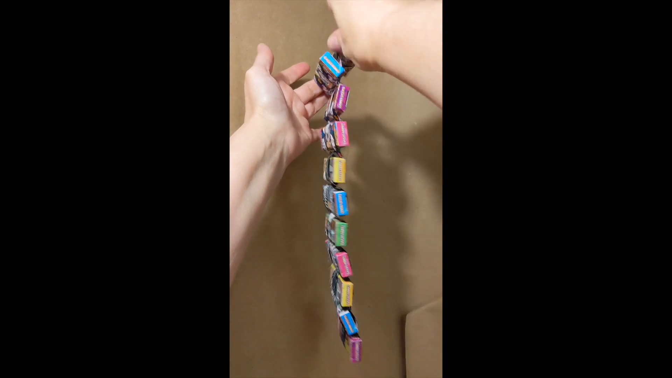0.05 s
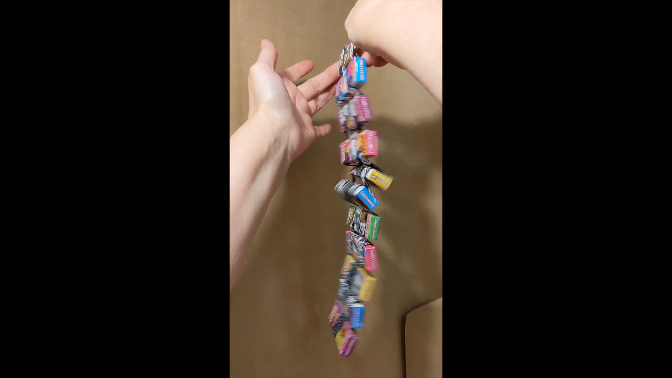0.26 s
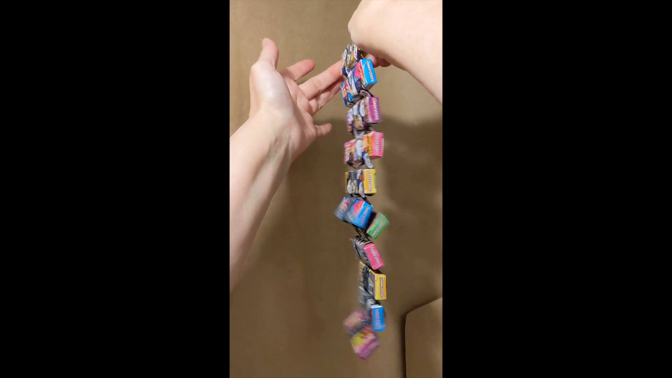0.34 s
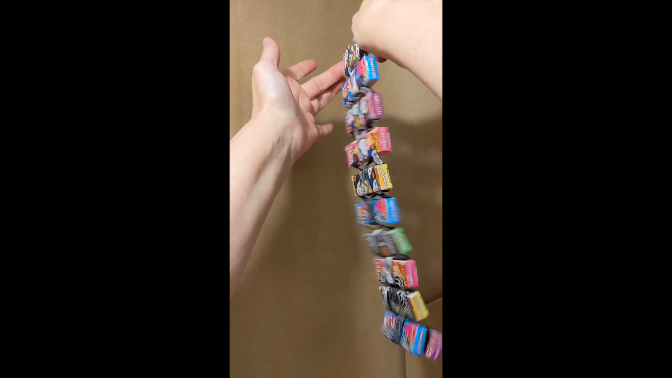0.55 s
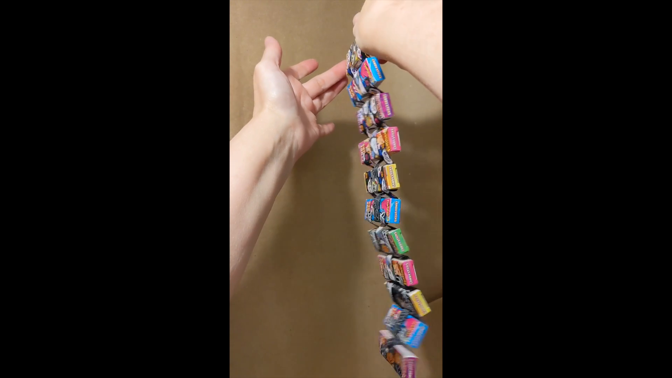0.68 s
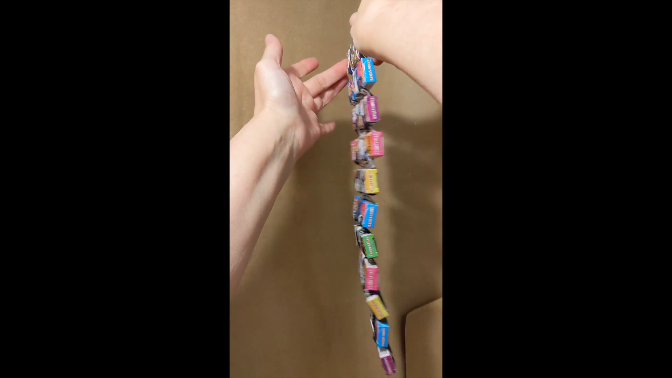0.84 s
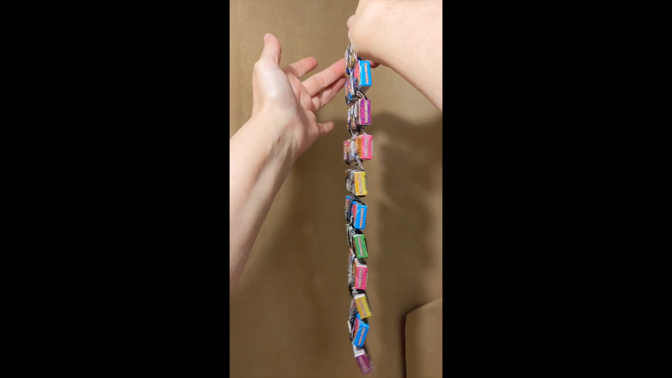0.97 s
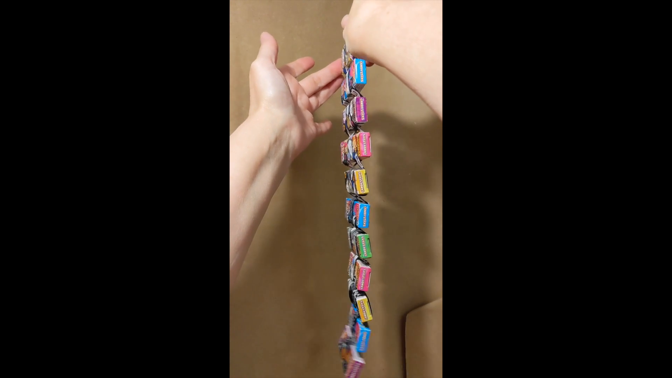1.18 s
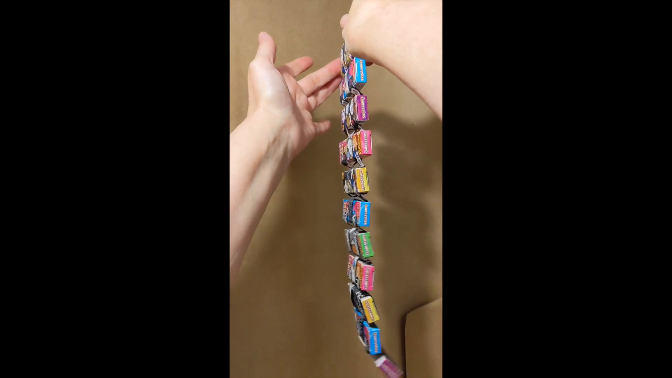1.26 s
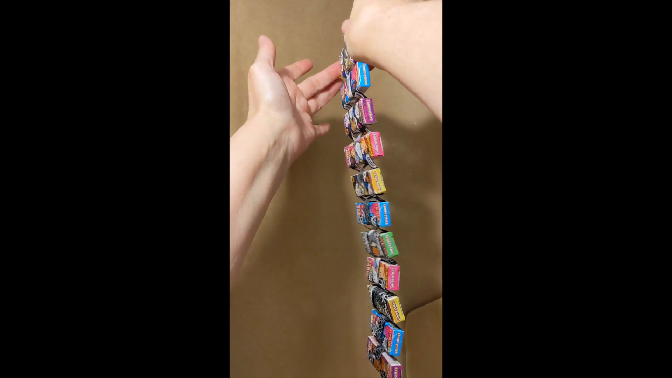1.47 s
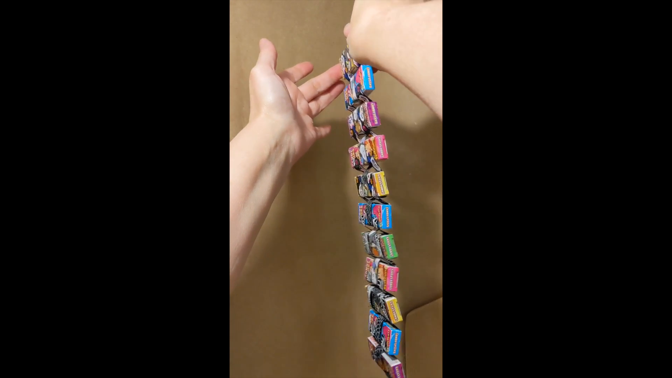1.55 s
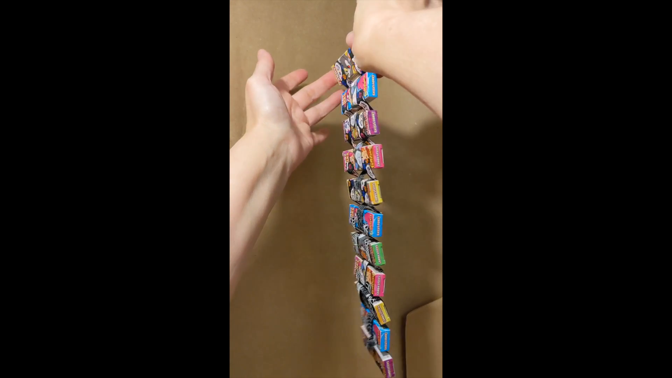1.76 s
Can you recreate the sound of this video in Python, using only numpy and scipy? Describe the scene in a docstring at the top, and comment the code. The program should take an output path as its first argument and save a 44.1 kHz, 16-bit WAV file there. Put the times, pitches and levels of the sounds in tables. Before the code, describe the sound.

Small ribbon-linked cardboard boxes tumble down in a quick clattering cascade, then tap lightly while swinging

```python
"""A quiet room, a pair of microphones: a ladder of small ribbon-linked cardboard boxes tumbles down,
knocks at the bottom and swings out. Each knock is a short dense burst of tiny contacts (edges, loose
contents) ringing in the boxes; light taps have weaker bounces, and card and ribbon rustle in between.
Contacts are random clicks sent through resonances; the room answers with dying dull noise.
Below lie a wavering low hum (noise in a narrow resonance) and the room's hiss (coloured noise)."""
import sys
import numpy as np
from scipy import signal
from scipy.fft import rfft, irfft
from scipy.io import wavfile

SR = 44100
rng = np.random.default_rng(int(sys.argv[2]) if len(sys.argv) > 2 else 0)


def convert_level_to_amplitude(level_db):
    """Map a level in decibels to its linear amplitude factor."""
    exponent = np.asarray(level_db, float) / 20
    return 10 ** exponent


def int16_out(signal):
    """Quantize to a 16-bit WAV file."""
    q = np.round(np.clip(np.atleast_2d(signal).T, -1, 1) * 32767)
    wavfile.write(sys.argv[1], SR, q.astype(np.int16))


N = 79380    # samples, 1.8 s


def rms_one(x):
    """Scale to unit rms."""
    return x / np.sqrt(np.mean(x ** 2) + 1e-20)


def at_hz(points, hz):
    """Read a (f/Hz, value) table on a log-frequency axis."""
    table_hz, values = np.transpose(points)
    return np.interp(np.log(hz), np.log(np.maximum(table_hz, 1)), values)


def drift(corner_hz):
    """Slow random wander of rms 1: noise through two equal one-pole low-passes."""
    r = np.exp(-2 * np.pi * corner_hz / SR)
    slow = signal.lfilter([1], [1, -2 * r, r * r], rng.standard_normal(N + SR))
    return rms_one(slow[SR:])    # the first second lets the filter settle


def ring(clicks, hz, t60):
    """Two-pole resonance that passes white noise at unchanged power."""
    r = convert_level_to_amplitude(-60 / (t60 * SR))
    w = 2 * np.pi * hz / SR
    gain = np.sqrt((1 - r * r) / 2)
    return signal.lfilter(gain * np.array([1, 0, -1]), [1, -2 * r * np.cos(w), r * r], clicks + 1e-18)


def contacts(per_s, spread_db):
    """Tiny contacts as random clicks of uneven size and either sign, rms 1."""
    size = convert_level_to_amplitude(spread_db * np.minimum(rng.exponential(1, N), 3))
    sign = rng.choice([-1, 1], N)
    struck = rng.random(N) < per_s / SR
    return rms_one(size * sign * struck)


HUM_HZ, HUM_DB = 60.3, -61.5
HUM_WIDTH_HZ = 12    # bandwidth of each of the two passes


def hum():
    """Wavering hum: noise twice through a narrow low resonance, the same at both microphones."""
    t60 = np.log(1000) / (np.pi * HUM_WIDTH_HZ)
    once = ring(rng.standard_normal(N + SR), HUM_HZ, t60)
    twice = ring(once, HUM_HZ, t60)
    return convert_level_to_amplitude(HUM_DB) * rms_one(twice[SR:])


# colour of the room's hiss: [f/Hz, relative level/dB per Hz]
HISS_COLOUR = [(30, -14), (70, -7), (157, -2), (273, -10), (1040, -18.5), (1860, -21.5), (3670, -44),
               (5590, -26), (13700, -37.5), (16000, -89)]
# likeness of the hiss at the two microphones: [f/Hz, left-right correlation from -1 to 1]
HISS_LIKENESS = [(60, 0.86), (240, 0.93), (950, 0.24), (3770, -0.4)]
HISS_DB = -60.5


def hiss():
    """Steady room noise: shaped mid and side noise, much alike at both microphones in the bass only."""
    hz = np.maximum(np.arange(N // 2 + 1) * SR / N, 1)
    alike = np.clip(at_hz(HISS_LIKENESS, hz), -1, 1)
    mid, side = rfft(rng.standard_normal((2, N))) * convert_level_to_amplitude(at_hz(HISS_COLOUR, hz))
    left_right = np.sqrt(1 + alike) * mid + np.sqrt(1 - alike) * side * [[1], [-1]]
    return convert_level_to_amplitude(HISS_DB) * rms_one(irfft(left_right, N))


ROOM_T60_S, ROOM_DB = 0.1, -13
WALL_CUT_HZ = 6300
ROOM_ALIKE_HZ = 650    # the answer is alike at both microphones below this


def room(x):
    """The room's answer: dull noise that dies away, starting 3 ms (a metre of path) after the direct sound."""
    t = np.arange(SR // 3) / SR
    mid, side = rng.standard_normal((2, len(t)))
    side = signal.sosfilt(signal.butter(1, ROOM_ALIKE_HZ, "high", fs=SR, output="sos"), side)
    dull = np.exp(-2 * np.pi * WALL_CUT_HZ / SR)
    answer = signal.lfilter([1], [1, -dull], [mid + side, mid - side])
    answer = answer * convert_level_to_amplitude(-60 * t / ROOM_T60_S) * (t > .003)
    unit_answer = rms_one(answer) / np.sqrt(len(t))
    return convert_level_to_amplitude(ROOM_DB) * signal.fftconvolve(x, unit_answer, axes=1)[:, :N]


# rustle of card and ribbon: [t/s, middle level/dB, treble level/dB], before clumping and ringing
RUSTLE_COURSE = [(0, -57.5, -63), (0.122, -62.5, -60.5), (.15, -68, -80), (.19, -64, -64),
                 (0.233, -44.5, -46.5), (.32, -44, -46.5), (.36, -49.5, -55), (.43, -43, -49.5),
                 (.6, -39, -45), (0.701, -47.5, -53.5), (0.728, -61, -60), (0.799, -50.5, -54),
                 (.9, -56.5, -64), (1.0, -58.5, -64.5), (1.13, -68.5, -79), (1.8, -70.5, -71.5)]
RUSTLE_BASS_DB = -6.5    # against the middle
RUSTLE_CONTACTS_PER_S, RUSTLE_SPREAD_DB = 400, 0.5    # per resonance
RUSTLE_CLUMP_HZ, RUSTLE_CLUMP_DB = 59, 2.7            # corner and rms of the level wander


def rustle_envelopes():
    """Force of the rustle in bass, middle and treble; it clumps, partly in step across the three."""
    s, middle_db, treble_db = np.transpose(RUSTLE_COURSE)
    t = np.arange(N) / SR
    shared = drift(RUSTLE_CLUMP_HZ)
    envelopes = []
    for course_db in (middle_db + RUSTLE_BASS_DB, middle_db, treble_db):
        clump = (shared + drift(RUSTLE_CLUMP_HZ)) / np.sqrt(2)
        envelopes.append(convert_level_to_amplitude(np.interp(t, s, course_db) + RUSTLE_CLUMP_DB * clump))
    return envelopes


# light taps while the ladder hangs and swings:
# [t/s, nominal peak level/dB, pitch f/Hz, treble level against peak/dB]
SWING_TAPS = [(0.0583, -39, 2260, -5.5), (0.0883, -43, 2050, -19), (0.1214, -46.5, 2730, -1.5),
              (0.156, -43, 2340, -4), (0.7396, -36.5, 1900, -20), (1.039, -40.5, 3200, -16),
              (1.0522, -35.5, 3230, -13), (1.0745, -36.5, 3180, -19.5), (1.099, -56, 3100, -23),
              (1.1469, -47.5, 1950, -5), (1.1747, -40.5, 2970, -18), (1.2305, -36, 2480, -26),
              (1.252, -48, 2900, -13), (1.2854, -46.5, 1700, -22.5), (1.3256, -37.5, 1270, -19),
              (1.3608, -47, 1910, -20), (1.394, -54, 2230, -32), (1.4079, -43.5, 1850, -25),
              (1.4197, -48, 1910, -3.5), (1.4874, -41.5, 1940, -13.5), (1.509, -42, 2180, -20),
              (1.5312, -47, 2640, -21), (1.6125, -46.5, 1840, -9), (1.6415, -47.5, 2130, -13),
              (1.672, -41.5, 2140, -18), (1.728, -41, 2260, -24)]
TAP_BASS_DB, TAP_T60_S = -12.5, .022    # bass against peak; die-away


def taps():
    """Each tap and its two weaker loose bounces, 5 to 35 ms later and 4 to 12 dB down, as knock rows."""
    touches = list(SWING_TAPS)
    late = rng.random((len(SWING_TAPS), 2, 2))
    for (s, db, _, treble_db), pair in zip(SWING_TAPS, late):
        for wait, size in pair:
            bounce_s = s + .03 * (0.18 + wait)
            bounce_db = db - 8 * (.5 + size)
            bounce_hz = 2600 * 2 ** (size - .5)    # weaker bounces are higher
            touches.append((bounce_s, bounce_db, bounce_hz, treble_db))
    return [(s, db, hz, TAP_BASS_DB, treble_db, TAP_T60_S) for s, db, hz, treble_db in touches]


# knocks of the tumble: [t/s, nominal peak level/dB, pitch f/Hz, bass level against peak/dB,
# treble level against peak/dB, die-away t60/s before the limits below]
TUMBLE_KNOCKS = [(0.1994, -29.5, 2050, -6.5, -7, 0.085), (0.2079, -27.5, 2360, -14, -10, 0.019),
                 (0.2175, -41, 1750, 0, -2, 0.045), (0.2397, -21.5, 6140, -17.5, -13, 0.02),
                 (0.2687, -21, 5900, -12, -15, 0.031), (0.3009, -26.5, 1870, -8, -6, 0.037),
                 (0.3067, -24.5, 1880, -17, -4.5, 0.018), (0.3697, -19.5, 1590, -11, -11.5, 0.049),
                 (0.3914, -27.5, 2970, -16, -18, 0.05), (0.4076, -34, 1870, -41, -21, 0.047),
                 (0.4216, -24, 2330, -19, -9, 0.053), (0.4406, -29, 2080, -8, -11, 0.042),
                 (0.4465, -26.5, 2280, -28, -7, 0.049), (0.4748, -24.5, 4640, -20, -11.5, 0.044),
                 (0.5105, -30, 2060, -10, -26, 0.013), (0.5455, -25.5, 2430, -29, -9, 0.044),
                 (0.5505, -24.5, 1900, -25, -10, 0.021), (0.5765, -19.5, 4700, -19, -12, 0.026),
                 (0.603, -26, 2020, -15, -19, 0.054), (0.6202, -19, 2530, -12.5, -6.5, 0.046),
                 (0.6255, -22.5, 5570, -25, -12.5, 0.027), (0.6306, -26, 1970, -5.5, -1.5, 0.023),
                 (0.649, -43.5, 1880, 5.5, -11, 0.04), (0.6826, -27.5, 1950, -19, -16, 0.034),
                 (0.6934, -29.5, 1910, -13, -15, 0.02), (0.7068, -43.5, 2080, -23, 4, 0.031),
                 (0.7503, -33, 1910, -17, -28, 0.029), (0.7650, -29, 2260, -9.5, -21, 0.023),
                 (0.7734, -26.5, 1780, -15, -12, 0.026), (0.7865, -27.5, 2950, -13.5, -17, 0.047),
                 (0.8008, -25, 2900, -28, -19, 0.013), (0.850, -35, 2080, -27, -15, 0.059),
                 (0.8617, -26.5, 2420, -14.5, -12.5, 0.029), (0.9256, -40, 1940, -13, -28, 0.036),
                 (0.9416, -37, 2220, -8, -9.5, 0.036), (0.9538, -34.5, 3230, -12, -17.5, 0.051),
                 (0.9795, -41.5, 1970, -13, -33, 0.051)]


def all_blows():
    """The knocks of the tumble, then the taps and bounces: every blow that strikes the boxes."""
    return TUMBLE_KNOCKS + taps()


CREST_DB, RISE_S = 10, .0012                       # peak over mean force (middle); start of a burst
SHORTEST_T60_S, LONGEST_T60_S = .004, .038         # limits on a burst's die-away
KNOCK_CONTACTS_PER_S, KNOCK_SPREAD_DB = 1400, 2    # per resonance
FAVOUR_DB, FAVOUR_OCTAVES = 9, 0.22    # a blow favours middle and treble resonances near its pitch
BLOW_COLOUR_DB = 3.5                   # each blow drives each resonance up to this much harder or softer
FIRST_TOUCH = (3, 6, 3.5)              # first contact against the burst's force: bass, middle, treble


def knock_force(blows, hz, part):
    """Contacts for one resonance: a strong first touch, and a burst that rises and dies quickly."""
    force = np.zeros(N + SR)
    first = np.zeros(N)
    t = np.arange(SR // 10) / SR
    chances = rng.uniform(-0.98, 1, len(blows))
    for (s, db, pitch, bass_db, treble_db, t60), chance in zip(blows, chances):
        near = np.exp(-.5 * (np.log2(hz / pitch) / FAVOUR_OCTAVES) ** 2)
        part_db = (bass_db, FAVOUR_DB * near - CREST_DB, FAVOUR_DB * near + treble_db)[part]
        top = convert_level_to_amplitude(db + BLOW_COLOUR_DB * chance + part_db)
        die_away = convert_level_to_amplitude(-60 * t / np.clip(t60, SHORTEST_T60_S, LONGEST_T60_S))
        start = int(s * SR)
        force[start:start + len(t)] += top * die_away * (1 - np.exp(-t / RISE_S))
        touch = start + int(RISE_S * SR * rng.uniform(.5, 2))
        first[touch] = FIRST_TOUCH[part] * top * rng.choice([-1, 1])
    return force[:N] * contacts(KNOCK_CONTACTS_PER_S, KNOCK_SPREAD_DB) + first


# broad colour of the card contacts: [f/Hz, level/dB], to which a 3 dB per octave rise is added
CARD_COLOUR = [(200, -21.5), (432, -4.5), (1420, -4.5), (1910, 5), (2800, -4.5), (3250, -5.5), (3970, -35),
               (4680, -5), (6520, -5.5), (16000, -27)]
# resonances of the boxes: [f/Hz, level/dB, die-away t60/s]
BOX_RESONANCES = [(440, -5, 0.024), (680, -3.5, 0.022), (1260, -1, 0.022), (1880, 4, 0.022),
                  (2230, 0, 0.014), (2595, -1, 0.013), (3200, 3, 0.013), (4774, -1, 0.0035),
                  (5740, -5, 0.0044)]
# balance of the two microphones: [f/Hz, left minus right level/dB]
MICROPHONE_BALANCE = [(180, 1), (550, 3.5), (1650, -4.5), (4970, 0.0), (15000, -1.5)]
CARD_CYCLES = 8.45                          # die-away t60 of a card contact, in cycles
BASS_TOP_HZ, TREBLE_FROM_HZ = 1100, 4000    # limits of the three ranges
SOFTNESS = 1.5          # contacts are dull above this multiple of the resonance they drive
LAG_SPREAD_S = .00027   # rms arrival difference between the microphones, some 9 cm of path


def boxes():
    """Each card and box resonance rings to its own contacts, each a little early or late at the right."""
    rustle, blows = rustle_envelopes(), all_blows()
    card = [(hz, at_hz(CARD_COLOUR, hz) + 10 * np.log10(hz / 2000), CARD_CYCLES / hz)
            for hz in np.geomspace(220, 15700, num=26)]
    resonances = card + BOX_RESONANCES
    pitches, dbs, _ = np.transpose(resonances)
    parts = (pitches > BASS_TOP_HZ) * 1 + (pitches > TREBLE_FROM_HZ)    # 0 bass, 1 middle, 2 treble
    whole = np.sqrt(np.bincount(parts, convert_level_to_amplitude(2 * dbs)))    # makes each range's squared gains add up to 1
    out = np.zeros((2, N))
    for (hz, db, t60), part in zip(resonances, parts):
        left = knock_force(blows, hz, part)
        left = left + contacts(RUSTLE_CONTACTS_PER_S, RUSTLE_SPREAD_DB) * rustle[part]
        lag = np.rint(LAG_SPREAD_S * SR * rng.standard_normal(N))    # one for every sample
        moved = np.clip(np.arange(N) + lag, 0, N - 1).astype(int)
        right = np.bincount(moved, left, N)
        soft = signal.butter(3, min(SOFTNESS * hz, .45 * SR), fs=SR, output="sos")
        both = signal.sosfilt(soft, [left + 1e-18, right + 1e-18])
        balance_db = at_hz(MICROPHONE_BALANCE, hz) * np.array([[.5], [-.5]])
        out += convert_level_to_amplitude(db + balance_db) / whole[part] * ring(both, hz, t60)
    return out


def scene():
    """The boxes and the room's answer to them, over hum and hiss."""
    ladder = boxes()
    return ladder + room(ladder) + hum() + hiss()


def top_cut(x):
    """Nothing passes above the cut-off."""
    return signal.sosfilt(signal.butter(12, 16330, fs=SR, output="sos"), x)


LOW_CUT_HZ, HIGH_CUT_HZ = 45, 16250


def record(dry):
    """The microphones lose the deep bass, and a steep filter cuts the top."""
    x = signal.sosfilt(signal.butter(4, LOW_CUT_HZ, "high", fs=SR, output="sos"), dry)
    x = signal.sosfilt(signal.cheby2(20, 60, HIGH_CUT_HZ, fs=SR, output="sos"), x)
    return top_cut(x)


dry = scene()
out = record(dry)
int16_out(out)
```